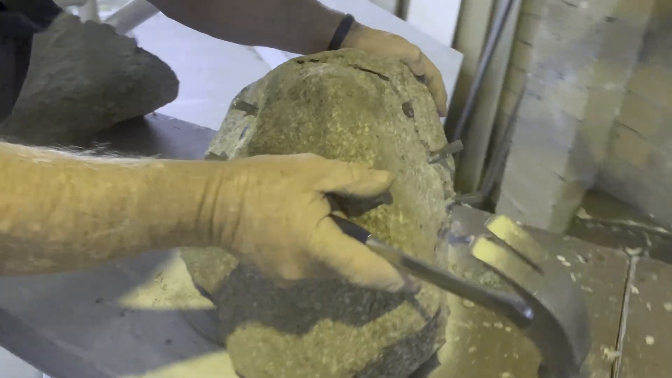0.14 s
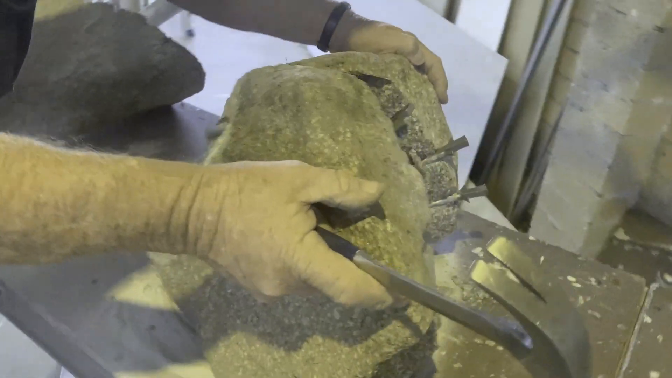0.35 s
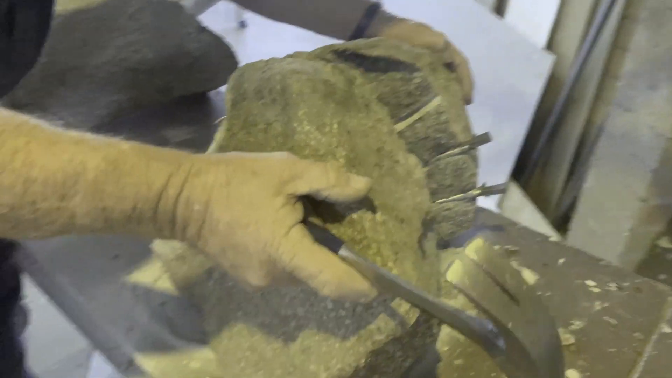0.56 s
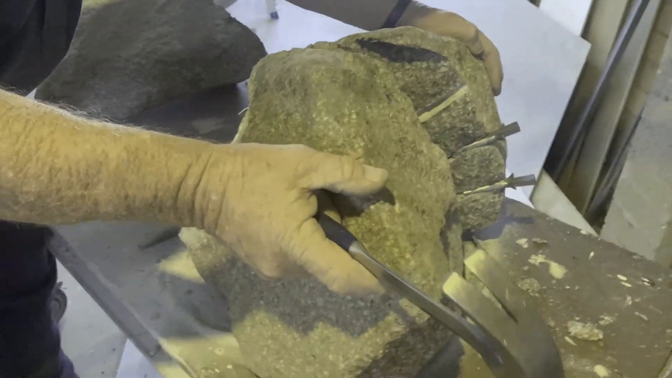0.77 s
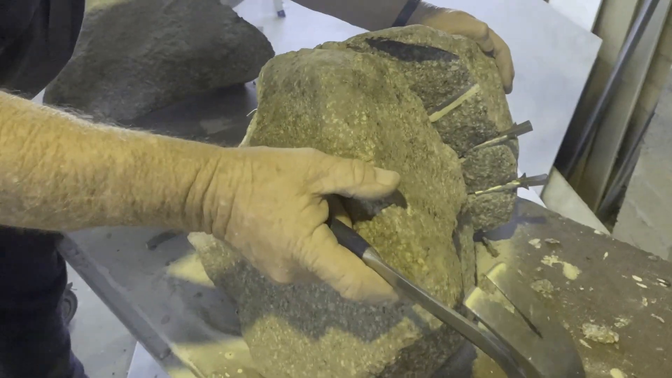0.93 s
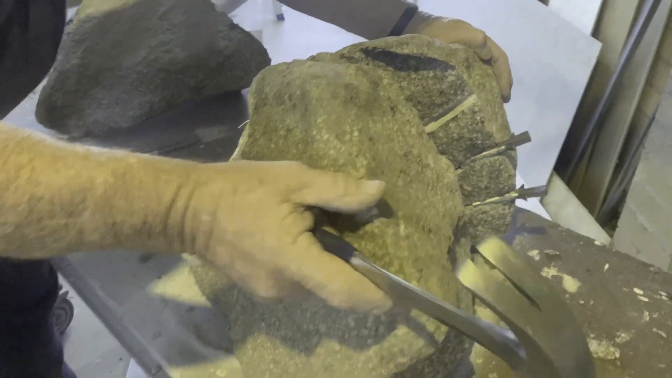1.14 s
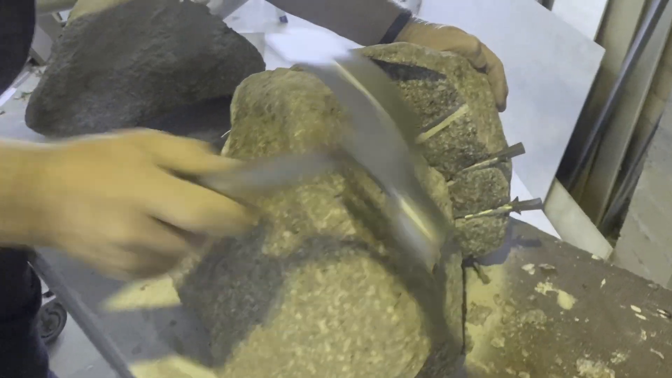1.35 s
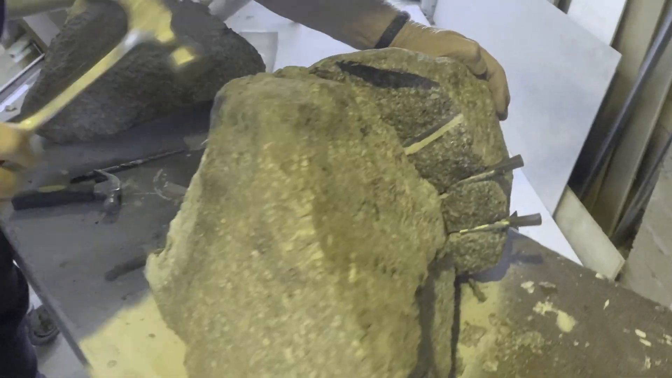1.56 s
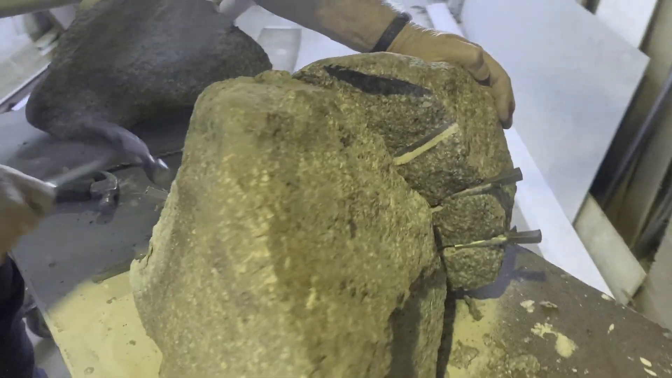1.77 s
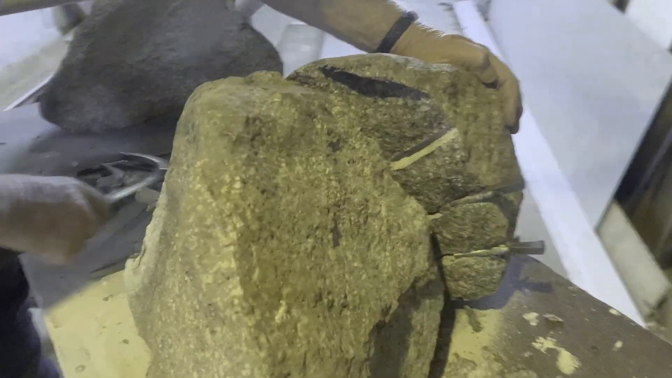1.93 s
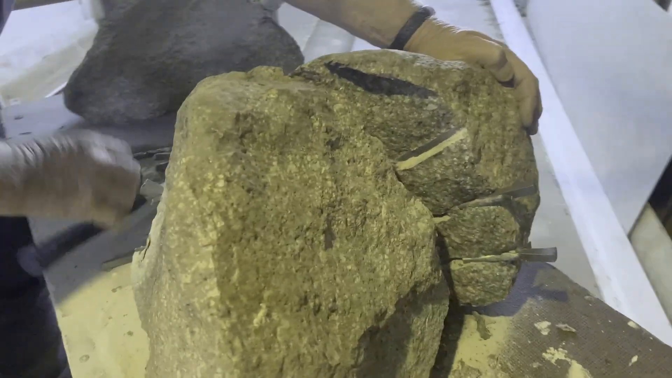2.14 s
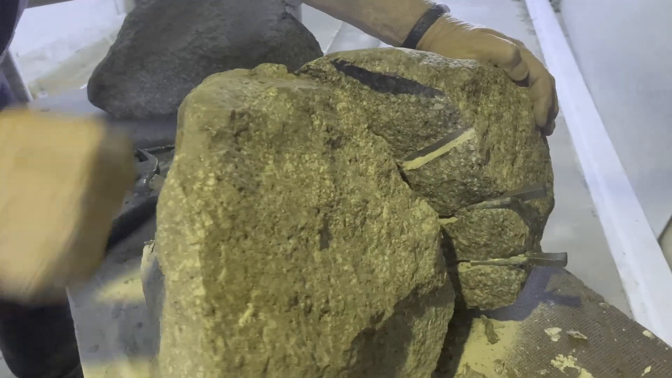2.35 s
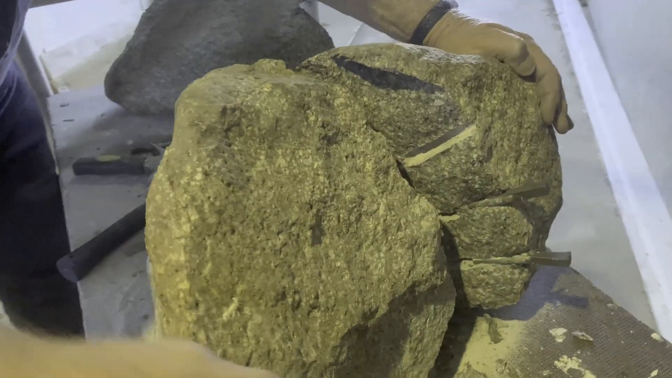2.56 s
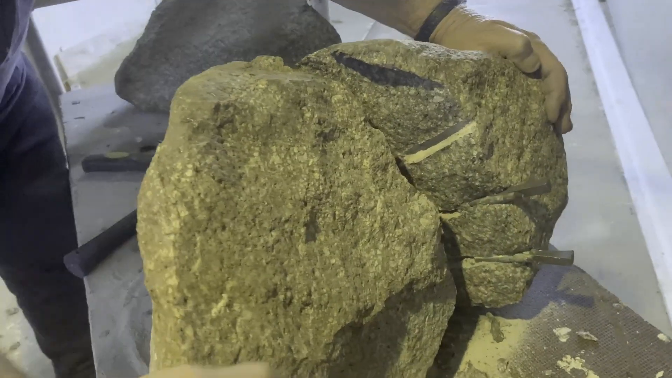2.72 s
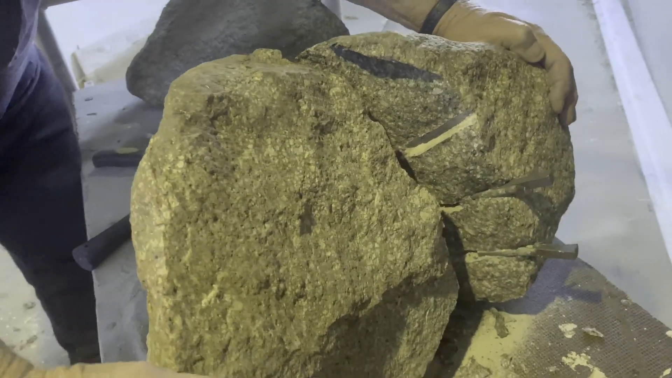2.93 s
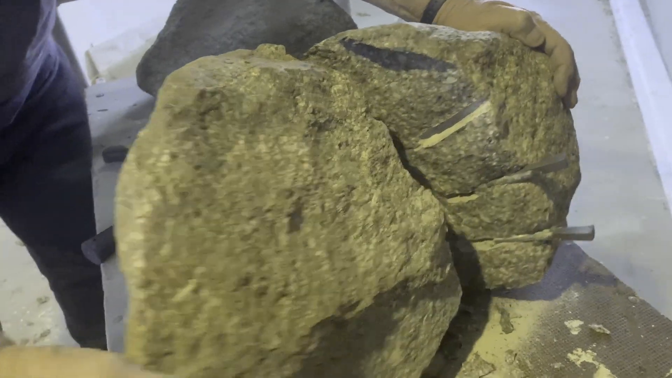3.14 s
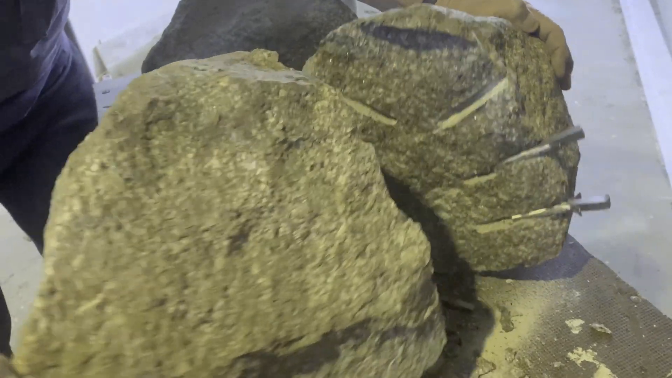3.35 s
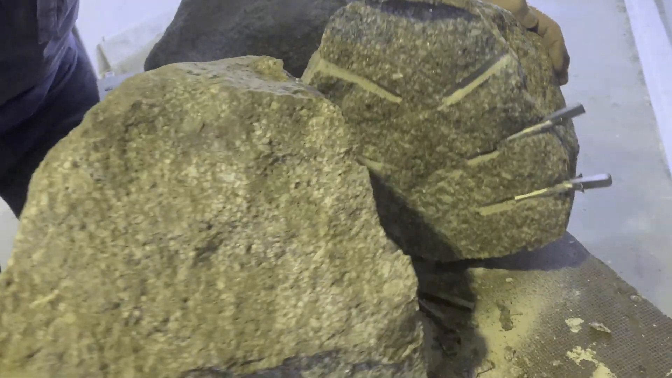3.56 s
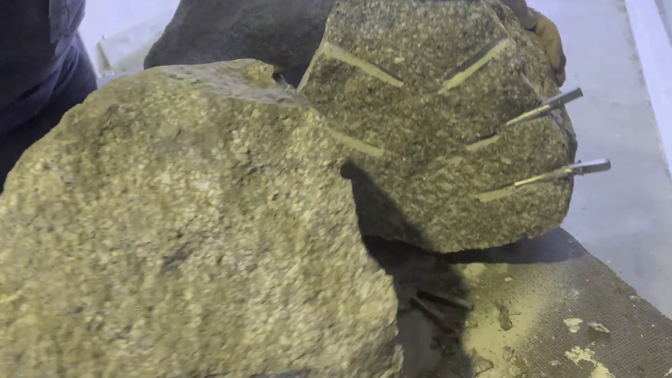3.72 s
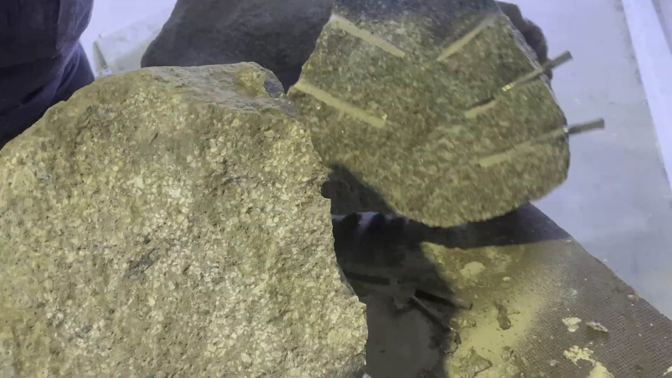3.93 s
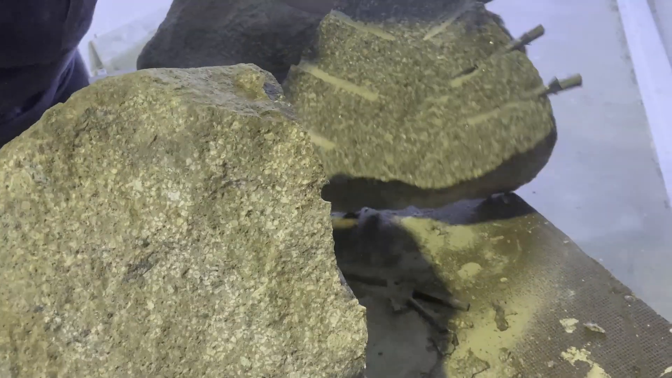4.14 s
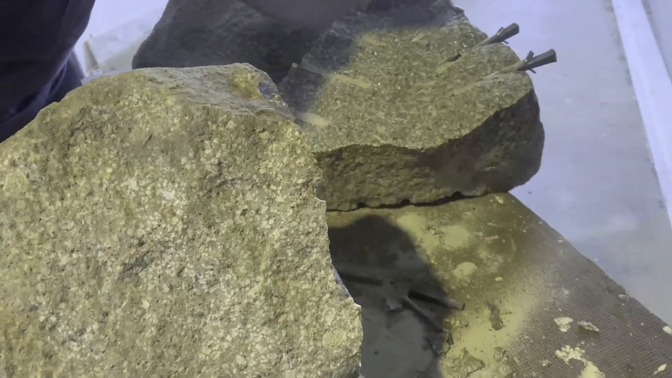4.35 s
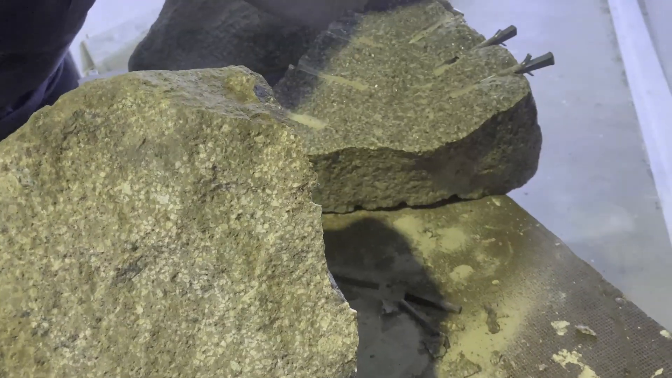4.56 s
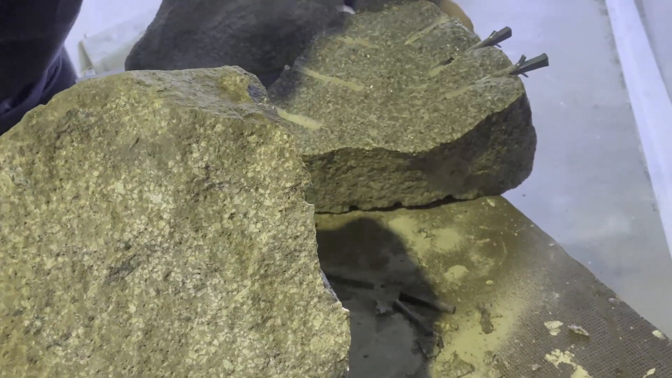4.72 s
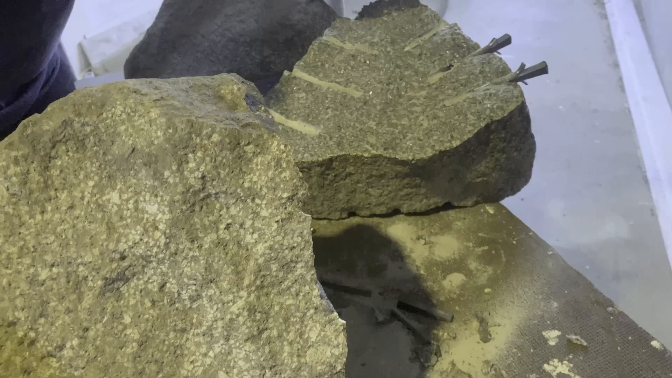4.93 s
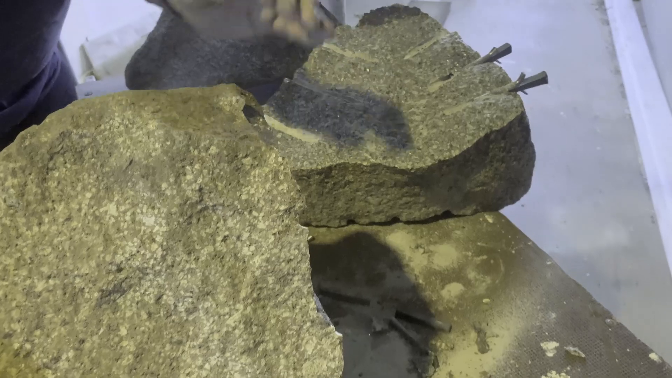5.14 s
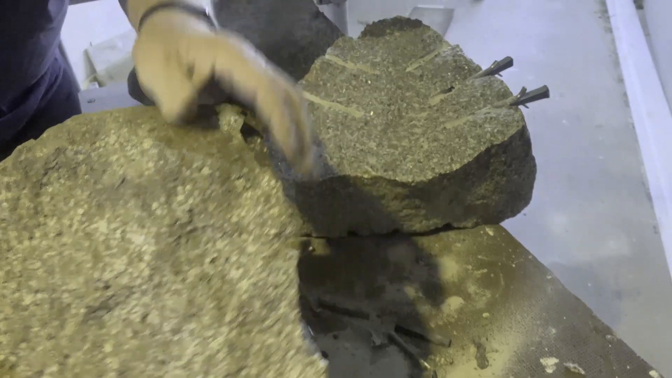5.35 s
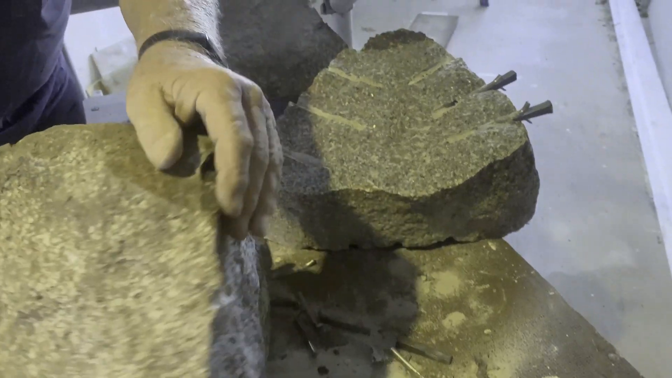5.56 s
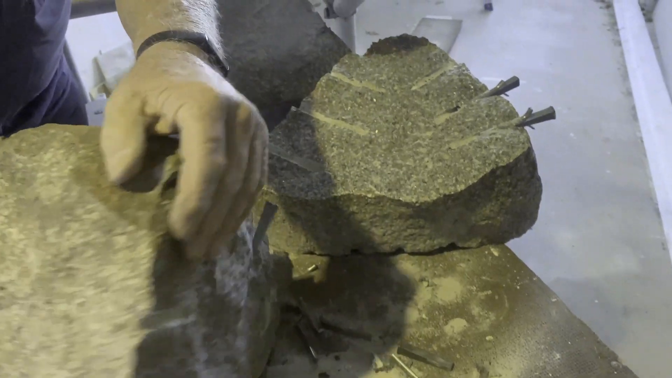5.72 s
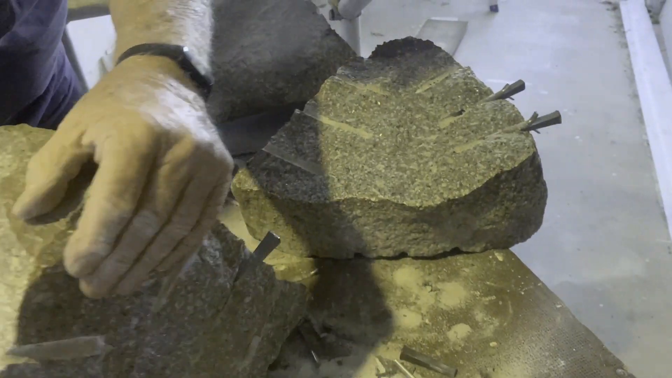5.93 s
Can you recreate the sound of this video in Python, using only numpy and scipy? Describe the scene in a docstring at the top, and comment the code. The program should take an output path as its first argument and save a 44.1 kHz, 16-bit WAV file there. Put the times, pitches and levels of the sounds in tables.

```python
"""Two halves of a split granite block grate close by in stick-slip bursts: random fractures ring the stone.
The halves snap (short modal rings), bite and groan (resonant bursts), rock (dull knocks), shed chips and grit
(coloured ticks); steel wedges clink (high modes), soft taps sound (sine bursts). A hammer and one half come
down on the bench (thuds, modes); dragged stone makes its top hum (uneven sines). Small workshop, quiet air."""
import sys
import numpy as np
from scipy import signal
from scipy.fft import rfft, irfft
from scipy.io import wavfile

SR = 44100
rng = np.random.default_rng(int(sys.argv[2]) if len(sys.argv) > 2 else 0)


def dump(signal):
    """Clip the signal to [-1, 1] and save it as 16-bit WAV at the path in sys.argv[1]."""
    limited = np.clip(np.atleast_2d(signal).T, -1, 1)
    pcm = np.round(limited * 32767).astype(np.int16)
    wavfile.write(sys.argv[1], SR, pcm)


N = 268569
TIME = np.arange(N) / SR

# faces catch and let go: t/s, drive level/dB, length/s, bite f/Hz, bite offset/dB
SLIPS = [(0.331, -24, 0.015, 1000, -10), (0.35, -24, 0.016, 640, -5), (0.371, -25.5, 0.013, 950, -2),
         (0.414, -25.5, 0.014, 520, -6), (0.442, -27, 0.009, 1000, 2), (0.556, -28, .003, 2900, -1),
         (0.592, -40, .005, 1900, -2), (0.65, -41, 0.0087, 560, 7), (0.813, -47.5, 0.064, 760, -4),
         (0.95, -42, .022, 1000, -1), (1.24, -63, 0.0031, 1900, -3), (3.103, -22.5, 0.012, 1520, -3),
         (3.118, -22, .012, 1050, -4), (3.166, -21.5, 0.007, 1450, -4), (3.185, -23.5, 0.009, 1520, -2),
         (3.203, -25, 0.008, 1550, 0), (3.219, -24.5, 0.009, 1040, 1), (3.244, -27, 0.013, 1500, -3),
         (3.286, -26.5, 0.0073, 3250, -5), (3.31, -32, .007, 3200, -3), (3.364, -41, 0.005, 1050, -3),
         (3.437, -39, .005, 1030, 1), (3.636, -39, .004, 1030, 2), (3.78, -44, 0.031, 1080, 0),
         (3.84, -35, 0.035, 1150, -5), (3.888, -29, 0.025, 3250, -8), (3.911, -27, 0.016, 1020, -2),
         (3.926, -25.5, .018, 860, -1), (4.112, -39, 0.0025, 3300, -3), (4.16, -37.5, 0.0076, 1300, -4),
         (5.328, -30, 0.014, 750, -2), (5.355, -25.5, 0.028, 640, -9), (5.699, -32.5, 0.005, 950, -5),
         (5.814, -27.5, 0.01, 2090, -1), (5.844, -26.5, 0.014, 1080, -4), (5.862, -26.5, .016, 1500, -2),
         (5.902, -32, 0.036, 1700, -7)]
# modes of one half: f/Hz, level/dB, t60/s
GRANITE = [(503, -5, 0.11), (1030, 5, 0.04), (1495, 5, 0.07), (1560, -2, .06), (1940, -6, 0.05),
           (2810, -7, 0.12), (3170, 2, 0.035), (4240, -5, .025)]
# modes of the other half: f/Hz, level/dB, t60/s
OTHER_HALF = [(500, -10.5, .16), (731, -2.5, 0.12), (845, 5, 0.12), (980, 4.5, 0.051), (1086, 5, 0.072),
              (1400, 1, .06), (1680, 3, 0.09), (2134, 2, 0.07), (2980, -5, 0.05), (4100, -4, 0.032)]
# modes of the bench top: f/Hz, level/dB, t60/s
BENCH = [(48.5, -16.5, 0.71), (91, -5, 0.25), (134.2, 9, 0.48), (253, 9, 0.27), (280, 2, 0.2),
         (318, 2, 0.16), (392, 5, .13), (418, 5, 0.22), (450, 0, .14), (488, 3, 0.16), (530, 4, 0.16),
         (590, 2, .13), (683, -6, .2), (775, -1, 0.2), (880, -2, .18), (962, 2, .16), (1135, 0, .14),
         (1250, -3, .14)]
# modes up to here radiate from the edges of the top
SIDEWAYS_HZ = 160
# spectrum of grinding stone: f/Hz, level/dB
GRIND = [(25, -54), (70, -27), (150, -37.5), (250, -0.5), (400, -11.5), (560, -8.5), (760, -9), (1050, -2),
         (1550, -2), (2400, -4.5), (3200, -5), (5000, -12.5), (8000, -22.5), (16000, -48)]
# spectrum of crushed grit: f/Hz, level/dB
GRIT = [(60, -29.5), (800, 2), (2500, 2.5), (4500, 9), (7000, 3.5), (10500, 5.5), (15500, 3)]


def grating():
    """Crystals catch and break: each fracture rings the granite and crackles as grit."""
    # pushes slide the faces; a half lifted onto an edge rings more freely: start t/s, rise/s, hold/s,
    # release/s, grind drive/dB, grit drive/dB, tipped half ring gain/dB, dragged half ring gain/dB
    pushes = [(0, 0.26, 0.11, 0.92, -45, -38, -24, 7.5), (2.537, 0.16, 0.15, 0.11, -78, -67, -21, -6),
              (2.88, 0.22, 0.55, 0.17, -45.5, -43, -7, -43), (3.731, 0.061, 0.042, 0.68, -45, -39, 5, 11),
              (4.338, 0.03, 0.15, 0.38, -52, -57, -10, 2),
              (5.222, 0.097, 0.62, 0.13, -42.5, -38.5, -33, -17)]
    grit_offset_db, pressed_ring_db = -4.5, -5
    fractures = grains(N, per_s=1200, spread_db=6.5)
    fractures = fractures * undb(2.2 * wobble(110) - .4)
    # the push itself is very slightly uneven
    fractures = fractures * undb(-0.1 * wobble(35))

    slide, jerk, crush, free = np.zeros(N), np.zeros(N), np.zeros(N), np.zeros((2, N))
    for start, rise, hold, release, db, grit_db, tipped_db, dragged_db in pushes:
        sliding = fractures * swell(start, rise, hold, release)
        slide += undb(db) * sliding
        crush += undb(grit_db - 7.5) * sliding
        # ring gains last until the next push
        free[:, TIME >= start] = undb([[tipped_db], [dragged_db]])
    for s, db, length_s, _, _ in SLIPS:
        burst = slip(length_s)
        # a short slip starts with the snap of one crystal
        burst[0] += 13 * np.exp(-length_s / .007)
        add(jerk, s, undb(db - 2.5) * burst)
        add(crush, s, undb(db + grit_offset_db) * burst)

    struck = (jerk + undb(pressed_ring_db) * slide) * free
    halves = granite(struck[0], GRANITE) + granite(struck[1], OTHER_HALF)
    grind = through(slide + jerk, colour(GRIND))
    grit = through(crush, colour(GRIT))
    return undb(-2.0) * grind + undb(-16.0) * halves + undb(3.0) * grit


def slip(length_s):
    """A burst of fractures: the faces speed up, run about as long as the slip, then lock again."""
    age = TIME[:SR // 6] / length_s
    speed = np.minimum(age * 3, 1) / (1 + age ** 4)
    burst = grains(len(age), per_s=2000, spread_db=5) * speed
    return unit(burst) * np.linalg.norm(speed)


def bites():
    """Each slip drives one resonance of the contact hardest; its pitch depends on where the faces catch."""
    out = np.zeros(N)
    for s, db, length_s, hz, bite_db in SLIPS:
        add(out, s, undb(db + bite_db) * resonate(slip(length_s), hz, q=13))
    return out


def snaps():
    """A crystal snaps: a sharp crack and a short ring of the half being moved, damped by the other."""
    # t/s, level/dB, favoured f/Hz
    breaks = [(0.352, -24, 700), (0.446, -22, 1050), (0.557, -18, 1400), (0.626, -27, 1100),
              (0.661, -27, 1300), (0.945, -29, 1000), (3.039, -32, 1030), (3.066, -35, 1500),
              (3.105, -22, 1550), (3.12, -24, 1100), (3.166, -21, 1100), (3.186, -23, 1100),
              (3.205, -23, 1400), (3.223, -21, 1400), (3.248, -28, 1550), (3.288, -25, 1100),
              (3.31, -30, 1100), (3.439, -33, 1030), (3.637, -33, 1030), (3.844, -31, 1200),
              (3.927, -24, 1400), (3.941, -28, 1400), (4.037, -29, 1200), (4.113, -34, 1500),
              (4.367, -27, 1000), (5.283, -42, 840), (5.331, -25, 800), (5.36, -24, 840), (5.374, -25, 730),
              (5.701, -27, 1000), (5.819, -27, 2100), (5.847, -26, 1050), (5.868, -24, 950)]
    # while the first half is tipped it rings, else the other: from t/s, to t/s
    tipping_s = (2.8, 4.4)
    fall_db_per_octave = 20
    out, cracks = np.zeros(N), np.zeros(N)
    damping = np.exp(-TIME[:SR] / .04)
    for s, db, pitch_hz in breaks:
        modes = GRANITE if tipping_s[0] < s < tipping_s[1] else OTHER_HALF
        # modes far from the favoured pitch ring less
        favoured = [(hz, mode_db - fall_db_per_octave * abs(np.log2(hz / pitch_hz)), t60)
                    for hz, mode_db, t60 in modes]
        tone = damping * ring(favoured)
        add(out, s, undb(db) * tone / np.max(np.abs(tone)))
        add(cracks, s, undb(db) * impact(chatter=.4, fade_s=.004, contact_s=.001))
    grind = through(cracks, colour(GRIND))
    grit = through(cracks, colour(GRIT))
    return undb(-2.5) * out + undb(-18) * grind + undb(-25) * grit


def rocking(contact_t60=0.06):
    """Heavy contacts knock dully; the halves bounce on the springy contact, at a pitch set by where they touch."""
    # t/s, knock drive/dB, bounce f/Hz, bounce offset/dB
    knocks = [(0.374, -40.5, 550, 6), (0.445, -25.5, 488, -6), (0.469, -40, 396, 9), (0.486, -32.5, 348, 2),
              (0.525, -34, 533, 7), (0.542, -37, 500, 4.5), (0.556, -24.5, 531, 8), (0.583, -35.5, 413, 6),
              (0.624, -28.5, 484, 1), (0.657, -27, 1235, 1.5), (0.668, -30.5, 450, -14),
              (0.692, -30, 475, -3), (0.943, -33.5, 611, 1.5), (1.037, -44.5, 284, -0.5),
              (2.684, -62.5, 640, 8), (3.089, -42.5, 586, 10.5), (3.121, -26, 496, 3),
              (3.141, -37.5, 494, 3.5), (3.288, -30.5, 225, -0.5), (3.297, -37.5, 480, 7.5),
              (3.772, -44.5, 260, 7), (3.923, -32, 555, -9), (4.037, -38, 546, -1), (4.161, -38, 770, -20),
              (4.368, -37, 910, 1.5)]
    # spectrum of a knock: f/Hz, level/dB
    knock_colour = [(30, -42), (100, -30), (190, -17), (300, -4), (480, 0), (700, -5), (1050, -2),
                    (1500, -5), (2100, -14), (2800, -15), (4500, -28), (9000, -40), (16000, -50)]
    force, bounce = np.zeros(N), np.zeros(N)
    for s, db, hz, bounce_db in knocks:
        add(force, s, undb(db) * impact(chatter=.55, fade_s=.012, contact_s=.0025))
        add(bounce, s, undb(db + bounce_db) * ring([(hz, 0, contact_t60)]))
    dull = through(force, colour(knock_colour))
    return undb(-3) * dull + undb(-22) * granite(force, OTHER_HALF) + bounce


def groans():
    """The foot of a half scrapes on the bench and drives a low resonance of the top."""
    # t/s, length/s, level/dB
    scrapes = [(3.044, 0.043, -46), (3.256, 0.041, -37), (3.286, 0.043, -34.5), (3.765, 0.026, -37),
               (3.894, 0.034, -34.5), (5.329, 0.029, -49), (5.815, 0.14, -44.5)]
    out = np.zeros(N)
    for s, length_s, db in scrapes:
        add(out, s, undb(db) * resonate(slip(length_s), hz=258, q=7))
    return out


def judder(hz=131):
    """The dragged stone hops at about the pitch of the bench top, never evenly, over a rumble."""
    # a half is dragged over the top: t/s, length/s, relative level/dB
    drags = [(0.33, 0.2, -56), (3.233, 0.68, -58), (3.648, 0.34, -58), (5.344, 0.16, -55.5),
             (5.497, 0.15, -51), (5.745, 0.07, -51.5)]
    rise_s, release_s = .12, .36
    phase = 2 * np.pi * np.cumsum(hz * (1 + .035 * wobble(45))) / SR
    hops = undb(1.2 * wobble(40)) * (np.sin(phase) + .18 * np.sin(2 * phase))
    rumble_colour = colour([(30, -34.5), (70, -19.5), (120, 2.0), (190, -5.0), (260, -4.5),
                            (600, -16.5), (3000, -76.5)])
    rumble = through(grains(N, per_s=900, spread_db=4.5), rumble_colour)
    drag = sum(undb(db) * swell(s - rise_s, rise_s, length_s, release_s) for s, length_s, db in drags)
    return undb(3.5) * drag * (hops + .5 * rumble)


def bench(blows, rebound_s, loss_db, rattle):
    """Blows thud on the top, rebound and rattle what lies on it."""
    # spectrum of a thud: f/Hz, level/dB
    thud = [(25, -46), (60, -37), (110, 2), (165, -25.5), (235, 2.5), (380, -4.5), (530, -2.5), (700, -6.5),
            (1100, -9.5), (1800, -14), (3000, -26.5), (5000, -40), (16000, -46.5)]
    force = np.zeros(N)
    for s, db, _, _ in blows:
        for delay_s, drop_db in bounces(rebound_s, loss_db, count=2):
            blow = impact(chatter=rattle, fade_s=.024, contact_s=.004)
            add(force, s + delay_s, undb(db + drop_db) * blow)
    return undb(-5) * through(force, colour(thud))


def panel(blows):
    """The upper modes of the bench top ring after each blow, strongest near its pitch and with random signs."""
    fall_db_per_octave = 5
    out = np.zeros(N)
    modes = [mode for mode in BENCH if mode[0] > SIDEWAYS_HZ]
    hz = np.transpose(modes)[0]
    tones = np.array([ring([mode]) for mode in modes])
    for s, db, pitch_hz, _ in blows:
        signs = rng.choice([-1, 1], len(modes))
        weights = signs * undb(-fall_db_per_octave * np.abs(np.log2(hz / pitch_hz)))
        add(out, s, undb(db - 6.5) * unit(weights @ tones) * np.sqrt(SR / 20))
    return out


def boom(blows, build_s=0.016):
    """The lowest modes of the bench top build up after each blow and boom on."""
    out = np.zeros(N)
    low_modes = [mode for mode in BENCH if mode[0] <= SIDEWAYS_HZ]
    tone = ring(low_modes) * (1 - np.exp(-TIME[:SR] / build_s))
    for s, _, _, boom_db in blows:
        add(out, s, undb(boom_db) * tone)
    return out


def wedges():
    """Steel wedges ring high and thin: a contact wakes modes near one pitch; the stone damps the ring."""
    # t/s, level/dB, favoured f/Hz
    clinks = [(0.338, -35.5, 2231), (0.411, -33.5, 13100), (0.445, -39.5, 11700), (0.5, -50, 11700),
              (0.505, -46.5, 10930), (0.528, -19.5, 15600), (0.533, -47, 8000), (0.624, -53, 10160),
              (0.654, -25, 15100), (0.815, -52.5, 11500), (1.066, -66, 11000), (1.337, -65, 11160),
              (3.94, -41, 10400), (3.943, -50, 12300), (3.945, -35, 15200), (4.17, -40, 7800)]
    # modes of a wedge: f/Hz, level/dB, t60/s
    wedge_modes = [(2246, 3, 0.71), (7290, -20.5, 0.35), (8700, 4, 0.19), (8480, 1.5, 0.27),
                   (10100, 0, 0.46), (10230, 9.5, 0.27), (10830, 4, 0.19), (12200, 3, 0.31),
                   (11800, -9, .45), (12040, 1, 0.84), (12400, -5, .25), (15190, -14.5, .5)]
    out = np.zeros(N)
    damping = np.exp(-TIME[:SR] / .25)
    for s, db, pitch_hz in clinks:
        # 1 dB less per 110 Hz off the pitch, 30 dB at most
        favoured = [(hz, mode_db - min(abs(hz - pitch_hz) / 110, 30), t60)
                    for hz, mode_db, t60 in wedge_modes]
        add(out, s, undb(db) * damping * ring(favoured))
    return out


def chips():
    """Small splinters snap off, drop and tick on the stone."""
    # t/s, drive level/dB
    ticks = [(0.043, -56), (0.094, -52), (0.816, -39.5), (1.155, -50), (1.231, -47.5), (2.017, -55),
             (2.117, -51), (2.179, -52), (2.595, -55.5), (2.913, -50.5), (2.979, -43), (4.113, -57.5),
             (4.245, -46.5), (4.591, -49.5), (4.73, -48), (4.853, -67), (4.939, -72), (5.242, -48.5)]
    force = np.zeros(N)
    for s, db in ticks:
        add(force, s, undb(db) * impact(chatter=0.34, fade_s=0.014, contact_s=0.013))
    return undb(-7.0) * through(force, colour(GRIT)) + undb(-8.5) * through(force, colour(GRIND))


def rustles():
    """Loose grit shifts under the stone and crunches in short patches of sparse ticks."""
    # t/s, length/s, level/dB
    patches = [(4.402, 0.029, -46), (4.554, 0.066, -50.5), (4.65, 0.025, -63), (4.846, 0.025, -59.5),
               (4.929, 0.029, -61.5), (4.986, .1, -73.5)]
    force = np.zeros(N)
    for s, length_s, db in patches:
        age = TIME[:SR // 3] / length_s
        envelope = np.minimum(age * 5, 1) / (1 + age ** 4)
        add(force, s, undb(db) * grains(len(age), per_s=700, spread_db=6) * envelope)
    crunch = colour([(300, 2), (1200, -5.5), (1850, 6.0), (2600, -7.5), (5500, -7.0), (8000, -17),
                     (16000, -24)])
    return through(force, crunch)


def blips(hz=610, length_s=0.011):
    """Short, soft, hollow taps: sine bursts under a smooth window."""
    # centre t/s, level/dB
    taps = [(1.394, -56.5), (1.732, -57), (1.762, -62), (5.09, -57.5), (5.114, -52), (5.157, -56)]
    out, t = np.zeros(N), TIME[:int(length_s * SR)]
    for s, db in taps:
        add(out, s - length_s / 2, undb(db) * np.hanning(len(t)) * np.sin(2 * np.pi * hz * t))
    return out


def air():
    """Quiet air of the workshop: steady coloured noise, independent per channel."""
    # f/Hz, level/dB
    air_colour = [(18, -49.5), (30, -19.5), (70, -1), (174, -13), (600, -12.5), (844, -20), (3140, -33),
                  (3670, -32.5), (4780, -35.5), (16000, -42.5)]
    noise = np.array([through(rng.standard_normal(N), colour(air_colour)) for _ in range(2)])
    return undb(-68.5) * noise


def granite(force, modes):
    """A half rings; as the contact point wanders, different modes take the lead."""
    out = sum(through(force * undb(5 * np.tanh(wobble(14))), ring([mode])) for mode in modes)
    # a block this small radiates no long waves
    highpass = signal.butter(2, 350, "high", fs=SR, output="sos")
    return signal.sosfilt(highpass, out) / np.linalg.norm(ring(modes))


def resonate(force, hz, q):
    """Gather the energy of a burst in one resonance."""
    t60 = np.log(1000) * q / (np.pi * hz)
    response = ring([(hz, 0, t60)])[:SR // 8]
    return unit(signal.fftconvolve(force, response)) * np.linalg.norm(force)


def impact(chatter, fade_s, contact_s):
    """Rough surfaces meet at many points, then chatter as they settle; the energy of 10 ms at rms 1."""
    t = TIME[:SR // 4]
    contact, settling = (unit(grains(len(t), 5000, 4.8) * np.exp(-t / s)) for s in (contact_s, fade_s))
    return unit(contact + chatter * settling) * np.sqrt(SR / 100)


def bounces(gap_s, loss_db, count, shrink=0.64):
    """A contact and its rebounds, in shrinking, slightly random gaps, each weaker: rows (delay/s, level/dB)."""
    gaps = gap_s * shrink ** np.arange(count) * np.exp(.1 * rng.standard_normal(count))
    return zip(np.append(0, np.cumsum(gaps)), -loss_db * np.arange(count + 1))


def grains(count, per_s, spread_db):
    """Tiny fractures at random moments over a faint floor, a few much larger than the rest; rms 1."""
    when = rng.random(count)
    sign = rng.choice([-1, 1], count)
    strength = np.clip(rng.standard_normal(count), -2, 2)
    gate = np.maximum(when < per_s / SR, 1e-3)
    return unit(gate * sign * undb(spread_db * strength)) * np.sqrt(count)


def ring(modes):
    """Sum of fading sines, 1 s long."""
    t = TIME[:SR]
    return sum(undb(db) * np.sin(2 * np.pi * hz * t) * np.exp(-np.log(1000) * t / t60)
               for hz, db, t60 in modes)


def swell(start, rise, hold, release, swell_db=31.5):
    """Gain that climbs evenly in dB, holds at 1 and dies away; silent before its start."""
    age = TIME - start
    below = np.maximum(1 - age / rise, 0) + np.maximum(age - rise - hold, 0) / release
    return (age >= 0) * undb(-swell_db * below)


def wobble(rate):
    """Smooth random motion with spread 1."""
    window = np.hanning(int(2 * SR / rate))
    return signal.fftconvolve(rng.standard_normal(N), unit(window), "same")


def colour(points, size=4096):
    """Causal minimum-phase response of unit energy with the given spectrum."""
    level_db = lookup(points, np.fft.rfftfreq(size, 1 / SR))
    cepstrum = irfft(np.log(undb(level_db)))
    # fold the cepstrum onto positive time
    cepstrum[1:size // 2] *= 2
    cepstrum[size // 2 + 1:] = 0
    return np.pad(unit(irfft(np.exp(rfft(cepstrum)))), (0, SR - size))


def lookup(points, hz):
    """Read a table on a log-frequency axis."""
    f, value = np.transpose(points)
    return np.interp(np.log(hz + 1), np.log(f), value)


def undb(db):
    """Decibels to gain."""
    return 10 ** (np.asarray(db) / 20)


def unit(x):
    """Scale to unit energy."""
    return x / np.sqrt(np.sum(x ** 2))


def add(track, s, sound):
    """Mix a sound into a track at s seconds."""
    start = max(int(s * SR), 0)
    track[start:start + len(sound)] += sound[:N - start]


def through(x, response):
    """Pass a sound through an impulse response."""
    return signal.fftconvolve(x, response)[:N]


def place(x, walls, lead_ms, near_db, room_db):
    """Direct sound reaches the left port lead_ms before the right; nearby things scatter it, then the walls."""
    direct = np.array([x, np.interp(TIME - lead_ms / 1000, TIME, x)])
    room = np.array([through(x, response) for response in walls])
    mix = direct + undb(near_db) * scattered(x) + undb(room_db) * room
    return mix / np.sqrt(1 + undb(2 * near_db))


def scattered(x, t60=0.08, shift_rate=7):
    """Stones and bench throw the sound back; the paths change as the stones move."""
    # small things scatter only short waves: f/Hz, level/dB
    scatter = [(100, -21.5), (280, 6.5), (600, 6.5), (16000, -5)]
    turn, out = 1.145 * wobble(shift_rate), 0
    x = through(x, colour(scatter))
    for share in np.cos(turn), np.sin(turn):
        paths = reflections([(100, t60), (14000, 0.51 * t60)], delay_s=.001)
        out = out + np.array([through(share * x, path) for path in paths])
    return out


def reflections(t60_points, delay_s):
    """Two-channel diffuse response that dies at its own rate in each band."""
    # stereo width: f/Hz, side re mid/dB
    width = [(60, 0.5), (130, 17.5), (260, -2), (400, -7), (700, -5.5), (1400, -0.5), (15000, -6.5)]
    hz, t, bins = signal.stft(rng.standard_normal((2, SR)), SR, nperseg=512)
    t60 = lookup(t60_points, hz)[:, None]
    side_gain = undb(lookup(width, hz))[:, None]
    bins = bins * np.exp(-np.log(1000) * t / t60)
    bins = bins * np.array([side_gain ** 0, side_gain]) / np.sqrt(1 + side_gain ** 2)
    mid, side = signal.istft(bins, SR)[1][:, :SR]
    pair = np.pad([mid + side, mid - side], ((0, 0), (int(delay_s * SR), 0)))[:, :SR]
    return unit(pair) * np.sqrt(2)


def scene():
    """All sources in the workshop, over its quiet air."""
    # hammer drops on the bench and topples: t/s, drive/dB, favoured f/Hz, boom level/dB
    hammer_blows = [(1.972, -23.5, 400, -33.5), (2.018, -19, 260, -38.5), (2.067, -24, 395, -31),
                    (2.232, -22, 390, -42), (2.256, -26, 524, -33.5), (2.355, -27.5, 280, -35),
                    (2.385, -32, 593, -45.5), (2.43, -35.5, 400, -35.5), (2.47, -39, 264, -40)]
    # tipped half comes down on the bench: t/s, drive/dB, favoured f/Hz, boom level/dB
    stone_blows = [(4.379, -29.5, 370, -30.5), (4.396, -42, 280, -52), (4.418, -34.5, 670, -39),
                   (4.439, -34, 260, -38)]
    # room decay: f/Hz, t60/s
    room_t60 = [(100, 1.5), (400, 0.83), (1200, 0.6143), (4000, 0.44), (14000, 0.16)]
    walls = reflections(room_t60, delay_s=.009)
    out = place(grating(), walls, lead_ms=.28, near_db=-7, room_db=-10)
    out += place(snaps() + bites(), walls, lead_ms=.14, near_db=-16, room_db=-11)
    out += place(rocking(), walls, lead_ms=.2, near_db=-8, room_db=-5)
    out += place(groans(), walls, lead_ms=-1, near_db=-20, room_db=-12)
    hammer = bench(hammer_blows, rebound_s=0.021, loss_db=4.5, rattle=1.7)
    out += place(hammer, walls, lead_ms=-0.21, near_db=-5, room_db=-8.0)
    stone = bench(stone_blows, rebound_s=0.017, loss_db=8, rattle=0.96)
    out += place(stone, walls, lead_ms=0.29, near_db=-5, room_db=-3.0)
    blows = hammer_blows + stone_blows
    out += place(panel(blows), walls, lead_ms=.06, near_db=-20, room_db=-14)
    # the top radiates sideways: its hum reaches the right port 2.5 ms later
    hum = undb(11.0) * judder() + boom(blows)
    out += np.array([hum, np.roll(hum, int(0.0025 * SR))])
    out += place(wedges() + blips(), walls, lead_ms=0.024, near_db=-15.5, room_db=-12.0)
    out += place(chips() + rustles(), walls, lead_ms=0.363, near_db=-1.0, room_db=-0.5)
    return out + air()


def record(dry):
    """The microphone ports notch the treble twice; the right is a little louder; rumble and top are cut."""
    ports = colour([(20, 0), (7700, 0), (8250, -3), (8650, -16), (9150, -1), (12600, 0), (13000, -4),
                    (13450, -17), (14100, -3), (15000, 0)])
    heard = np.array([through(x, ports) for x in dry]) * undb([[-1.3], [-.7]])
    rumble_cut = signal.butter(3, 42, "high", fs=SR, output="sos")
    top_cut = signal.ellip(8, .2, 70, 16200, fs=SR, output="sos")
    return signal.sosfilt(top_cut, signal.sosfilt(rumble_cut, heard))


dry = scene()
out = record(dry)
dump(out)
```